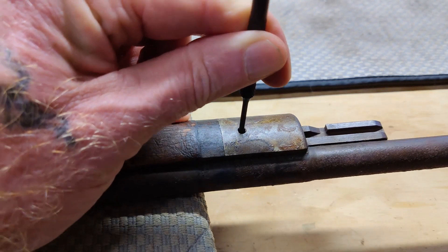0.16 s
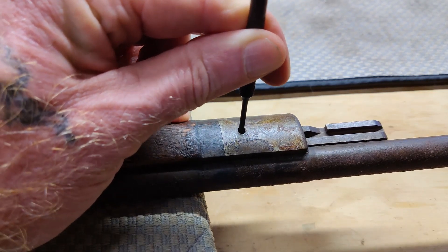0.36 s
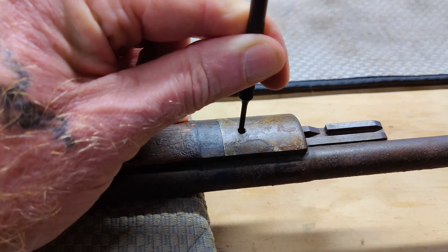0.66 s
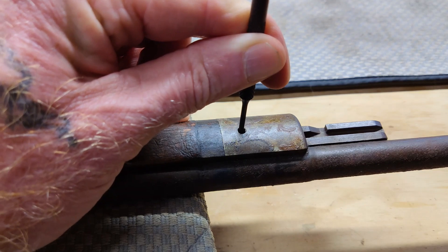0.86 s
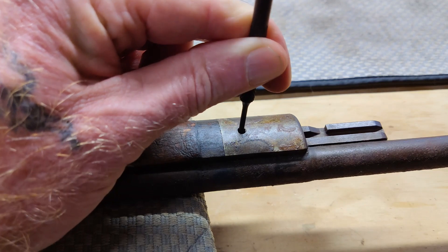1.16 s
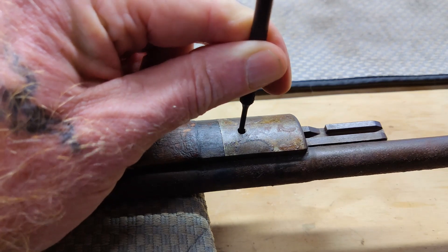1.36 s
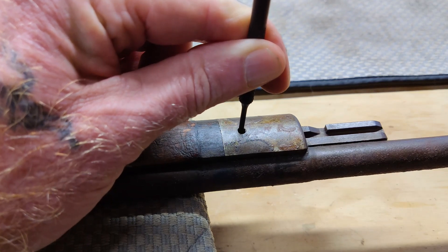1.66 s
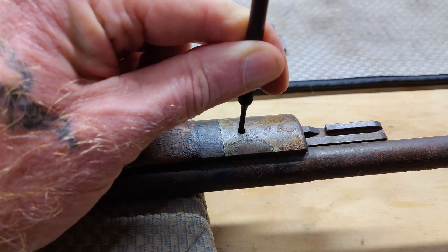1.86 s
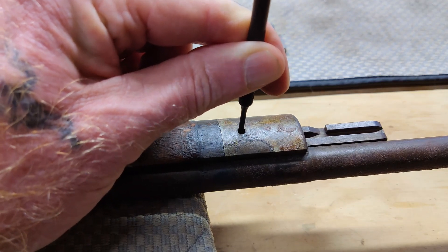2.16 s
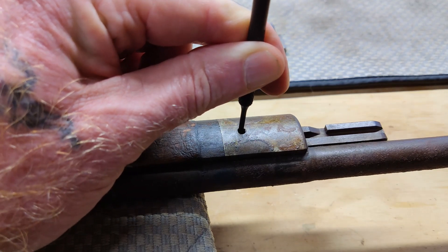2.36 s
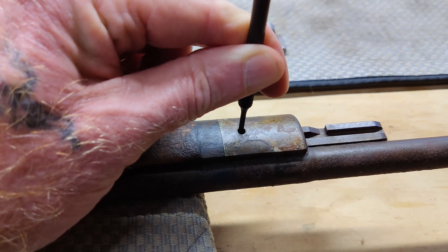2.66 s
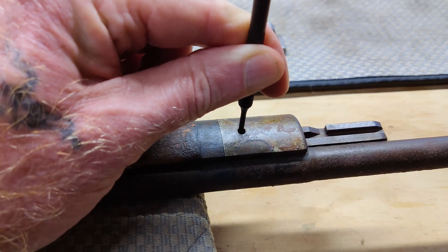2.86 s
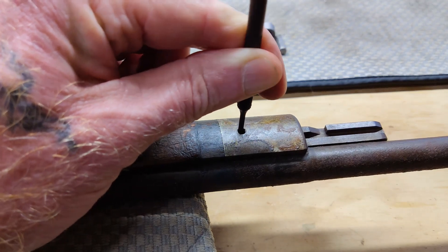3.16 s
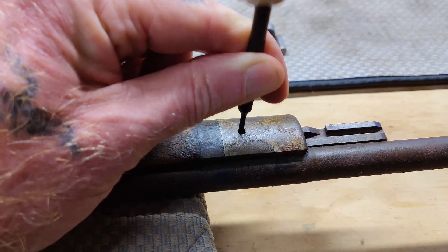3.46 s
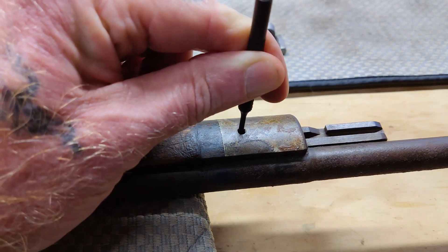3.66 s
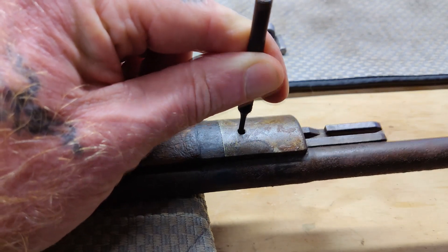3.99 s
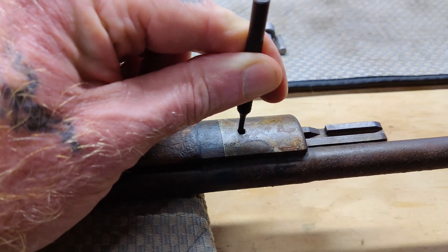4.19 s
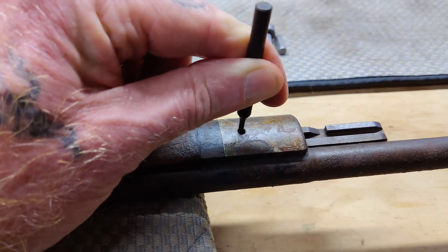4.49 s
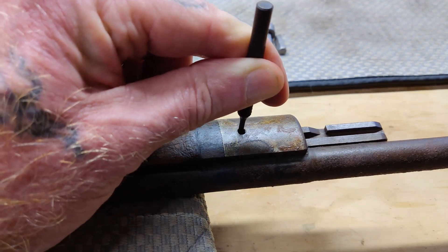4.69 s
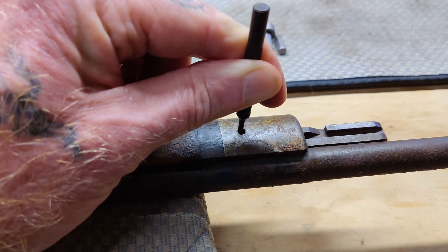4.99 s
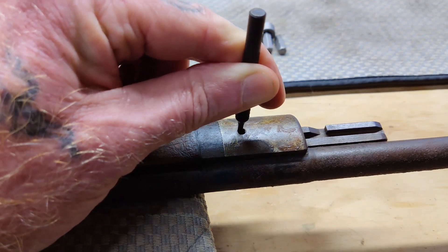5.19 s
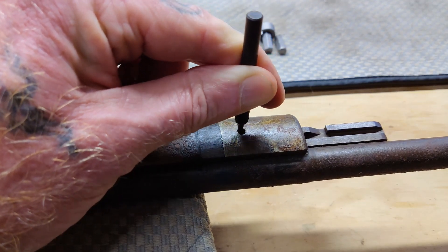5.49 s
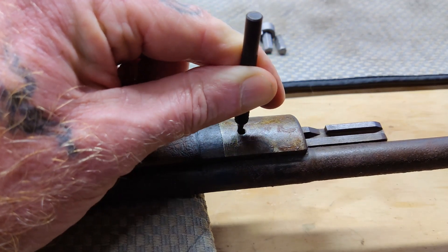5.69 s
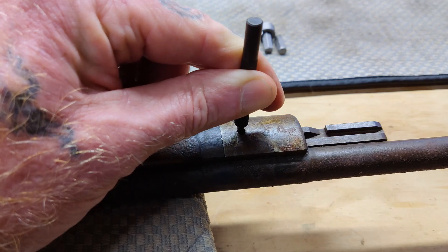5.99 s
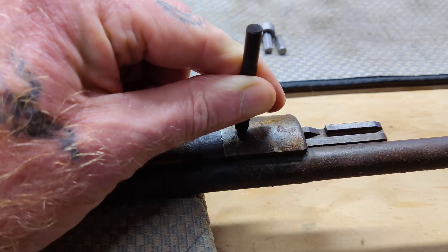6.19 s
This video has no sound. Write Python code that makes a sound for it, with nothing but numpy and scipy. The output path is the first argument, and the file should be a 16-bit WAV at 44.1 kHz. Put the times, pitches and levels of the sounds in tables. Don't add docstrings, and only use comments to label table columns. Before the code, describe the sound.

Close, hard steel-on-steel hammer blows ring briefly, each followed by a dull wooden knock and loose clatter over low room hum.

```python
import sys
import numpy as np
from scipy import signal
from scipy.io import wavfile
from scipy.ndimage import uniform_filter1d, minimum_filter1d

SR = 44100
rng = np.random.default_rng(int(sys.argv[2]) if len(sys.argv) > 2 else 0)


def natural_amplitude(level_db):
    exponent = np.asarray(level_db, float) / 20
    return 10 ** exponent


def transcribe(signal):
    frames = np.atleast_2d(signal).T
    limited = np.clip(frames, -1, 1)
    pcm = np.round(limited * 32767).astype(np.int16)
    wavfile.write(sys.argv[1], SR, pcm)


N = 279594

# [f/Hz, level per Hz/dB]
ROOM_TONE = [(25, -2.5), (55, -0.5), (120, -6), (230, -3), (340, -5), (500, -3.5), (1000, -17), (2000, -21),
             (4000, -30.5), (7000, -33.5), (10000, -38), (16000, -50.5)]
# [f/Hz, width/Hz, level/dB]
HUM = [(317.7, 2.7, -56), (358.5, 11, -56.5), (419, 52, -68.5), (996, 30, -73)]
# [f/Hz, likeness from -1 to 1]
LIKENESS = [(60, 0.57), (130, 0.91), (290, 0.72), (640, -0.27), (1410, -0.088), (3100, -0.43),
            (6820, -0.34), (15000, -0.05)]
BLOW_S = [0.1974, 0.6142, 1.0405, 1.4213, 1.781, 2.1417, 2.5299, 2.9695, 3.4652, 3.8007, 4.0743, 4.4148,
          4.8036, 5.1259, 5.4426, 5.8289, 6.1631]
# [strength/dB, contact/ms, looseness of parts/dB, jolt of bench/dB]
LANDING = [(-1, 0.89, 9.5, -5.5), (0.5, 1.15, 4, 6.5), (2, 1.14, 12.5, 5.5), (-3, 1.1, 0, -10),
           (1.5, 0.79, 8.5, 2), (-2, 0.95, 10.5, 8), (0.5, 1.32, 9.5, 10.5), (-1, 1.02, 4.5, -6),
           (-2.5, 0.94, -2, -11.5), (1, 1.16, -14, -8), (-2.5, 1, -2.5, 4), (-3, 1.01, 5, -12),
           (-6, 1.2, 0.5, -6.5), (-6.5, 1.18, 10, 9), (-9, 0.82, 8, 8), (-7, 1.12, 3, -8),
           (-2, 0.78, -1, 12.5)]
SKIP_S = [
    0.2006,
    5.1277,
    5.8304,
    5.8332,
    6.1641,
    6.1667,
]
# [crack level/dB, contact/ms]
SKIP_LANDING = [(-20.5, 1.5), (-25, 1.7), (-15, 0.94), (-23.5, 0.66), (-8.5, 1.53), (-11.5, 0.95)]
# [f/Hz, left level/dB, right level/dB, t60/contact time]
HEAD = [(900, -44.5, -23, 2.3), (1500, -26.5, -13, 3.2), (2397, -14, -15.5, 5.9), (3400, -21, -27.5, 0.28),
        (4150, 2.5, -16, 2.51), (6455, -21.5, 2.5, 2.68), (7470, -1.5, -8, 3.4), (9080, -34, -5, 16),
        (11020, 5, -27.5, 2.5), (12540, -16, 3, 2.4), (14900, -23, -17, 2.1)]
# [f/Hz, left level/dB, right level/dB, t60/s]
STEEL = [(1774, -18.5, -22.5, 0.0059), (2112, -44.5, -27, 0.025), (3750, -35.5, -50, 0.0057),
         (4316, -36, -24, 0.009), (5230, -39.5, -35.5, 0.045), (4320, -36.5, -42.5, 0.0092)]
# [f/Hz, width/Hz, left level/dB, right level/dB, t60/s]
SHIMMER = [(4070, 200, -21.5, -51.5, 0.053), (4710, 880, -30, -52.5, 0.13), (6500, 600, -21.5, -33, 0.075)]
# [f/Hz, blow level/dB, rebound level/dB, t60/s]
BENCH = [(52.95, -30, -38.5, 0.58), (68.6, -28, -42.5, 0.47), (115.5, -47, -41, 0.38),
         (135.9, -30.5, -49, 0.11), (178, -35.5, -37.5, 0.28), (219.1, -34.5, -46.5, 0.48),
         (245, -49.5, -32, 0.12), (308.4, -50.5, -28, 0.094), (334.9, -30.5, -29.5, 0.12),
         (406, -41.5, -45.5, 0.26), (543, -34, -39, 0.12), (696, -43.5, -38.5, 0.13),
         (729.3, -33.5, -42, 0.16), (976, -62, -42, 0.019), (1294, -39, -29, 0.028)]
# [f/Hz, level per Hz/dB, t60/s]
ECHO = [(149, 5, 0.25), (400, -7, 0.16), (1007, -8, 0.11), (2500, -14.5, 0.1), (5000, -25, 0.14),
        (7500, -26.5, 0.13), (9500, -18, 0.04), (12400, -26.5, 0.22), (16100, -29, 0.13)]
# [t/s, level/dB]
RUSTLE = [
    (3.075, -200),
    (3.084, -52),
    (3.112, -61),
    (3.125, -200),
]
# [f/Hz, width/Hz, leak level/dB, gain/dB]
PORTS = [
    (4530, 1700, -18.5, -3),
    (6640, 1570, -41.5, -3),
]

# (level/dB, share of strength, share of jolt, change as the punch sinks/dB per s)
KNOCK_LAW, THUD_LAW = (-21.5, 0.88, 0.0748, 0.71), (2.4, 0.13, 0.055, -0.035)
FRAME_LAW, ECHO_LAW = (0.5, 1.1, -0.23, 0.8), (5, 1.2, -0.114, 0.49)

ROOM_TONE_DB, ECHO_DB, CLATTER_DB, HISS_DB, CRACK_BOOST_DB = -48, -21, -14.5, -69.5, 12.5
GRIT_DB, GRIT_START_DB, GRIT_DB_PER_S = -17, -4, 2.29
SKIP_GRIT_DB = 5.5
GLANCE_DB, GLANCE_GRIT_DB = -8.5, 15
HEAD_SEATED_DB_PER_S, HEAD_CHOKED_DB_PER_S = 0.2, -0.9
LOW_RING_DB_PER_S = -0.3
LEAN_DB_PER_S = 0.8
SINK_DB_PER_S = -0.5
REBOUND_S, SOONER_S_PER_DB = 0.0173, 0.00013
BENCH_LEAN_DB = 1.5
BENCH_SHIFT = 0.22
RATTLE_DB_PER_S = 0.7
LIMIT_DB, RELEASE_S, LOOK_AHEAD_S = 3, 0.057, 0.0069


def rms_one(x):
    return x / np.sqrt(np.mean(x ** 2) + 1e-20)


def at_hz(table, hz, column=1):
    table = np.array(table)
    return np.interp(np.log(hz), np.log(table[:, 0]), table[:, column])


def clicks(seconds, sizes):
    out = np.full(N, 1e-18)
    out[np.round(np.asarray(seconds) * SR).astype(int)] = sizes
    return out


def ring(x, hz, t60):
    r, w = natural_amplitude(-60 / (t60 * SR)), 2 * np.pi * hz / SR
    return signal.lfilter([0, np.sin(w)], [1, -2 * r * np.cos(w), r * r], x)


def dying(x, t60):
    return signal.lfilter([1], [1, -natural_amplitude(-60 / (t60 * SR))], x)


def drift(rate):
    r = np.exp(-80 * np.pi * rate / SR)
    white = rng.standard_normal(N // 40 + 2002)
    slow = signal.lfilter([1], [1, -2 * r, r * r], white)[2000:]
    return np.interp(np.arange(N) / 40, np.arange(len(slow)), rms_one(slow))


def bands(lowest_hz, gain_at):
    edges = lowest_hz * 2 ** np.arange(0, np.log2(19000 / lowest_hz), .5)
    white = rng.standard_normal((2, 2, N))
    out = 0
    for k, (low, high) in enumerate(zip(edges, edges[1:])):
        band = signal.butter(2, [low, high], "band", fs=SR, output="sos")
        mid, side = signal.sosfilt(band, white[k % 2])
        hz = np.sqrt(low * high)
        alike = np.clip(at_hz(LIKENESS, hz), -1, 1)
        stereo = np.sqrt(1 + alike) * mid + np.sqrt(1 - alike) * side * [[1], [-1]]
        out = out + gain_at(hz) * stereo
    return out


def blows():
    return np.vstack([BLOW_S, np.transpose(LANDING)])


def answer_db(law):
    s, strength_db, _, _, jolt_db = blows()
    return law[0] + law[1] * strength_db + law[2] * jolt_db + law[3] * s


def rebounds():
    s, *_, jolt_db = blows()
    return s + REBOUND_S - SOONER_S_PER_DB * jolt_db


def room_tone():
    air = rms_one(bands(21.78, lambda hz: natural_amplitude(at_hz(ROOM_TONE, hz) + 1.3 * drift(7.8))))
    hum = 0
    for hz, width, level_db in HUM:
        hum = hum + natural_amplitude(level_db) * rms_one(ring(rng.standard_normal(N), hz, 2.2 / width))
    return natural_amplitude(ROOM_TONE_DB) * air + hum


def head_contact(s, crack_db, contact_ms, grit_db):
    force, after = np.full((2, N), 1e-18), np.arange(600) / SR
    grit = .9 * rng.standard_normal((2, 600)) + .4 * rng.standard_normal((len(s), 2, 600))
    detune = rng.normal(1, .015, (len(s), len(HEAD)))
    for k, start in enumerate(np.round(s * SR).astype(int)):
        lasts = contact_ms[k] / 1000
        grit_shape = np.minimum(after / 0.00028, 1) * np.exp(-(after / lasts) ** 6.1)
        burst = natural_amplitude(grit_db[k] + GRIT_DB) * np.diff(grit[k], prepend=0) * grit_shape
        hold = np.exp(-(after / (.9 * lasts)) ** 3.0)
        onset = np.minimum(after / 0.00018, 1)
        for (hz, left_db, right_db, t60), off in zip(HEAD, detune[k]):
            fade = natural_amplitude(-60 * after / (t60 * lasts)) * hold
            wave = np.sin(2 * np.pi * hz * off * after) * fade
            slope = HEAD_SEATED_DB_PER_S if hz < 1950 else HEAD_CHOKED_DB_PER_S if hz < 3000 else 0
            depth_db = slope * (s[k] - 2.5)
            burst += natural_amplitude([[left_db + depth_db], [right_db + depth_db]]) * wave * onset
        lean_db = LEAN_DB_PER_S * (s[k] - 2) * np.array([[.5], [-.5]])
        force[:, start:start + 600] += natural_amplitude(crack_db[k] + CRACK_BOOST_DB + lean_db) * burst
    force[0] = np.roll(force[0], 6)
    return force


def steel_ring(s, crack_db):
    out = 0
    spread = rng.normal(0, 2.0, (len(s), len(STEEL)))
    for (hz, left_db, right_db, t60), chance_db in zip(STEEL, spread.T):
        slope = LOW_RING_DB_PER_S if 1950 <= hz < 3000 else 0
        hit = clicks(s + 0.00034, natural_amplitude(crack_db + 19.5 + chance_db + slope * (s - 3.5)))
        out = out + natural_amplitude([[left_db], [right_db]]) * ring(hit, hz, t60)
    return out


def crack():
    skips = np.vstack([SKIP_S, np.transpose(SKIP_LANDING)])
    s, crack_db, contact_ms = np.hstack([blows()[:3], skips])
    grit_db = np.where(np.isin(s, SKIP_S), SKIP_GRIT_DB, GRIT_START_DB + GRIT_DB_PER_S * s)
    glancing = s == BLOW_S[-1]
    crack_db = crack_db + GLANCE_DB * glancing
    grit_db = np.where(glancing, GLANCE_GRIT_DB, grit_db)
    force = head_contact(s, crack_db, contact_ms, grit_db) + steel_ring(s, crack_db)
    return signal.sosfilt(signal.butter(1, 500, "high", fs=SR, output="sos"), force)


def shimmer():
    s, echo_db = blows()[0], answer_db(ECHO_LAW)
    out = 0
    for hz, width, left_db, right_db, t60 in SHIMMER:
        narrow = rms_one(ring(rng.standard_normal(N), hz, 2.2 / width))
        fade = dying(clicks(s, natural_amplitude(echo_db + SINK_DB_PER_S * s)), t60)
        out = out + natural_amplitude([[left_db], [right_db]]) * narrow * fade
    return out


def bench():
    blow, *_, push_db = blows()
    rebound = rebounds()
    knock_db, thud_db, frame_db = answer_db(KNOCK_LAW), answer_db(THUD_LAW), answer_db(FRAME_LAW)
    spread, out = rng.normal(0, 1.5, (len(blow), 2, len(BENCH))), 0
    for k, (hz, blow_db, rebound_db, t60) in enumerate(BENCH):
        part_db = frame_db if hz < 90 else thud_db if hz < 280 else knock_db + 24
        push = clicks(blow + 0.0018, natural_amplitude(blow_db - 4.5 + part_db + spread[:, 0, k]))
        push -= clicks(rebound, natural_amplitude(rebound_db + 3.5 + part_db + spread[:, 1, k]))
        far_port = np.cos(hz / 900) * natural_amplitude(BENCH_LEAN_DB * (-1) ** k)
        wood = ring(push, hz, t60) * (-1) ** k
        ahead = np.gradient(wood) * SR / (2 * np.pi * hz)
        out = out + wood * np.array([[1.2], [far_port]]) - BENCH_SHIFT * ahead * [[1], [-1]]
    puff = ring(clicks(rebound - .004, natural_amplitude(push_db - 26.5)), 58, 0.036)
    out = out - puff * [[1.2], [1]]
    out = signal.sosfilt(signal.butter(2, 36, "high", fs=SR, output="sos"), out)
    return signal.lfilter([.3], [1, -.7], out)


def echo():
    s, *_, clatter_db, _ = blows()
    rattle_db = clatter_db + RATTLE_DB_PER_S * (s - 3)
    sharp = clicks(s, natural_amplitude(answer_db(ECHO_LAW)))
    dull = clicks(s, natural_amplitude(answer_db(THUD_LAW) + 1.0))
    knock = clicks(rebounds(), natural_amplitude(rattle_db - 9.0))
    clatter = natural_amplitude(CLATTER_DB - ECHO_DB) * dying(clicks(s, natural_amplitude(clatter_db)), 0.025)

    def gain_at(hz):
        blow = dull if hz < 300 else sharp + knock * min(1, (1300 / hz) ** 2)
        tail = dying(blow, at_hz(ECHO, hz, column=2)) - dying(blow, 12 / hz)
        uneven = natural_amplitude(at_hz(ECHO, hz) + 2.0 * drift(68))
        return uneven * (tail + clatter * min(1, hz / 3000))
    return natural_amplitude(ECHO_DB + 13.5) * bands(140.2, gain_at)


def rustle():
    level_db = np.interp(np.arange(N) / SR, *np.transpose(RUSTLE))
    bright = signal.butter(2, [5500, 12000], "band", fs=SR, output="sos")
    return natural_amplitude(level_db) * signal.sosfilt(bright, rng.standard_normal((2, N)))


def scene():
    return room_tone() + crack() + shimmer() + bench() + echo() + rustle()


def port(x, hz, width, leak_db, gain_db):
    r, w = np.exp(-np.pi * width / SR), 2 * np.pi * hz / SR
    poles = [1, -2 * r * np.cos(w), r * r]
    cavity = signal.lfilter([sum(poles)], poles, x)
    return natural_amplitude(gain_db) * (cavity + natural_amplitude(leak_db) * x)


def limiter(x):
    excess_db = np.maximum(20 * np.log10(np.abs(x) + 1e-9) - LIMIT_DB, 1e-3)
    ahead, t = round(LOOK_AHEAD_S * SR), np.arange(N) / SR / RELEASE_S
    held = np.exp(np.maximum.accumulate(np.log(excess_db) + t, axis=1) - t)
    early = -minimum_filter1d(-held, size=2 * ahead + 1)
    return x * natural_amplitude(-uniform_filter1d(early, size=ahead))


def roll_off(x):
    return signal.sosfilt(signal.butter(12, 16830, fs=SR, output="sos"), x)


def record(dry):
    at_ports = np.array([port(x, *p) for x, p in zip(dry, PORTS)])
    heard = at_ports + natural_amplitude(HISS_DB) * rng.standard_normal((2, N))
    rounded = .96 * np.tanh(limiter(heard))
    mix = signal.sosfilt(signal.cheby2(10, 60, 17100, fs=SR, output="sos"), rounded)
    return roll_off(mix)


dry = scene()
out = record(dry)
transcribe(out)
```